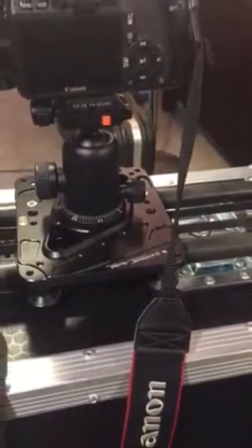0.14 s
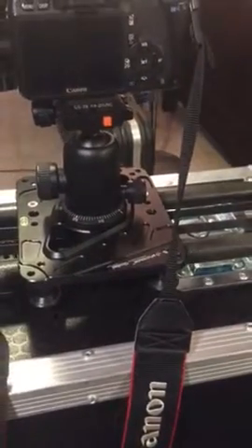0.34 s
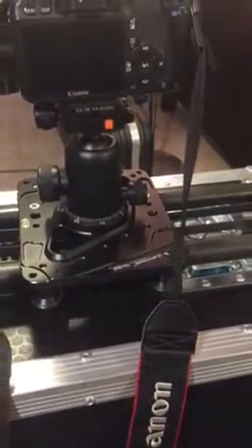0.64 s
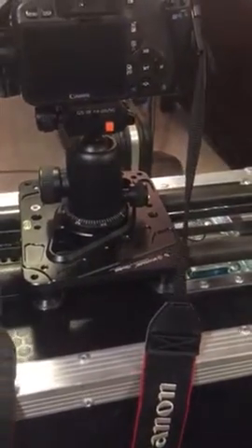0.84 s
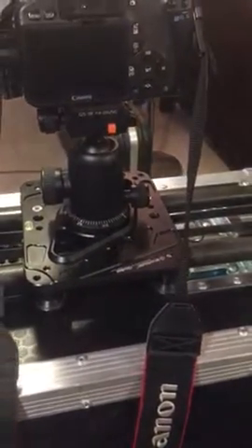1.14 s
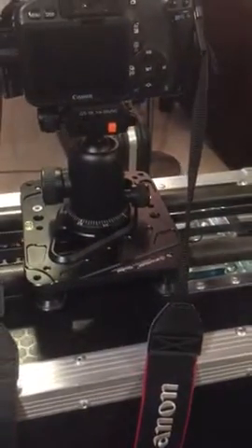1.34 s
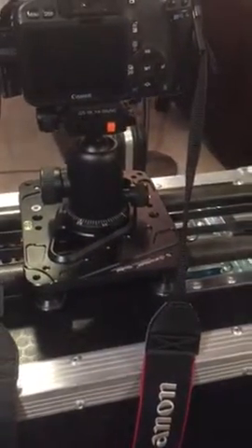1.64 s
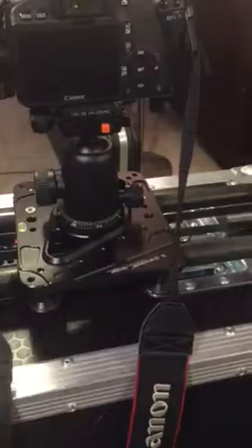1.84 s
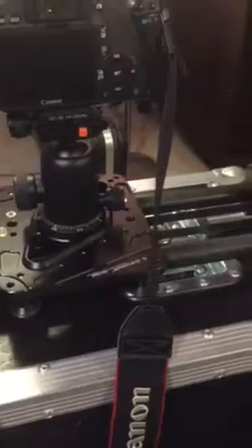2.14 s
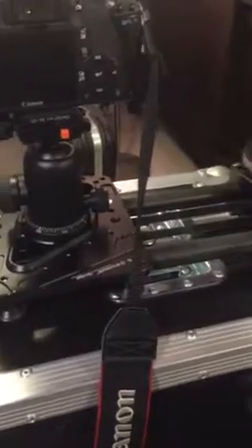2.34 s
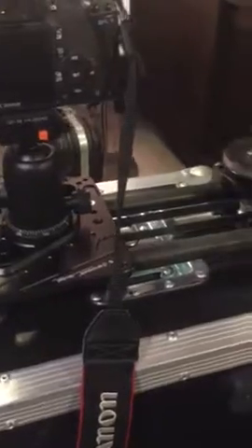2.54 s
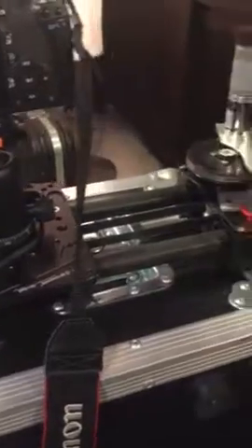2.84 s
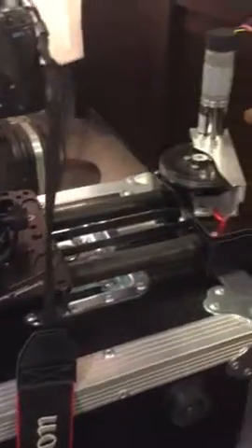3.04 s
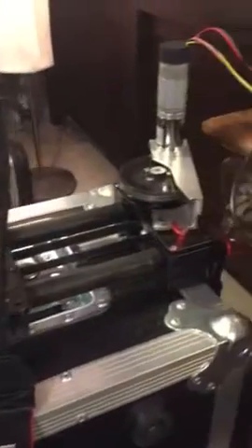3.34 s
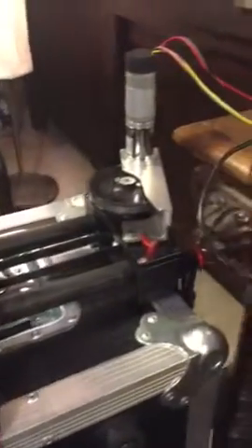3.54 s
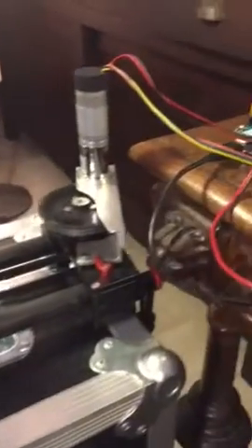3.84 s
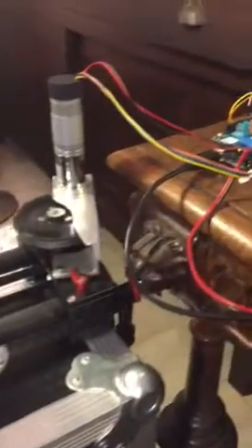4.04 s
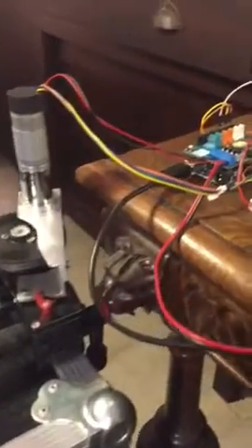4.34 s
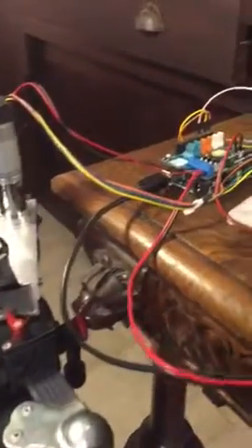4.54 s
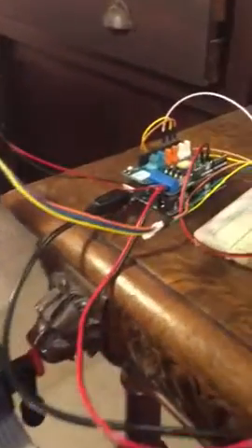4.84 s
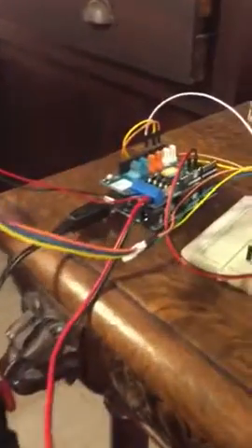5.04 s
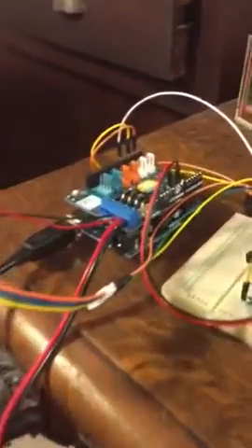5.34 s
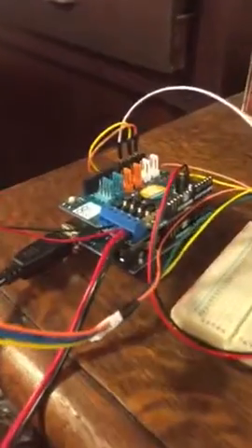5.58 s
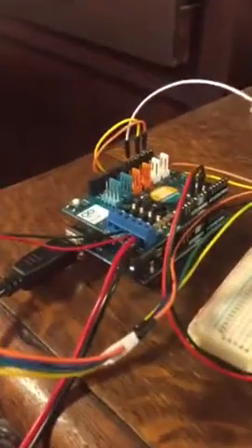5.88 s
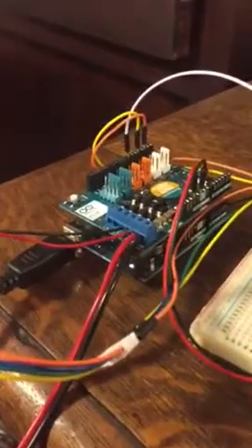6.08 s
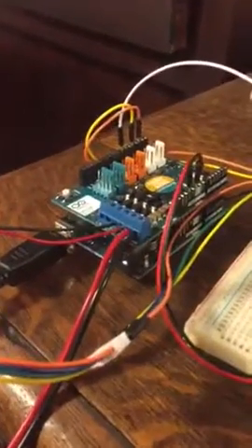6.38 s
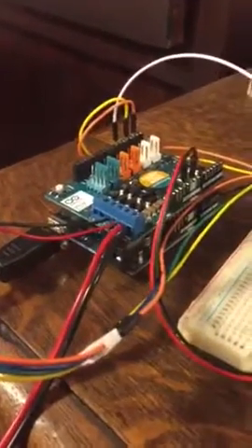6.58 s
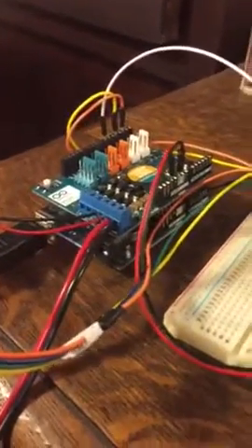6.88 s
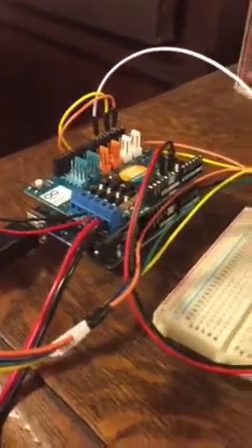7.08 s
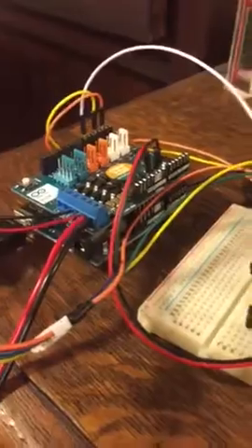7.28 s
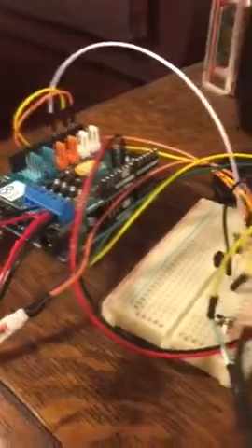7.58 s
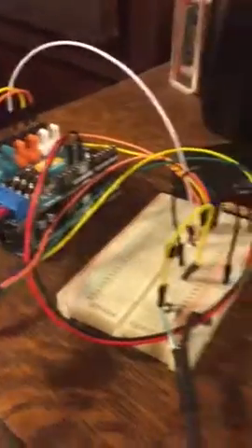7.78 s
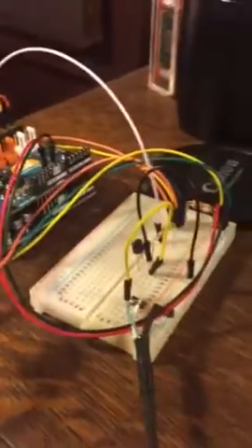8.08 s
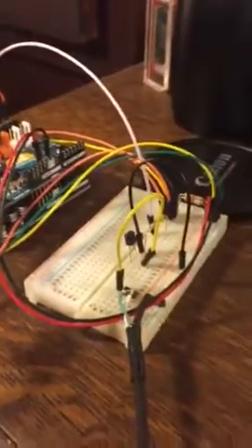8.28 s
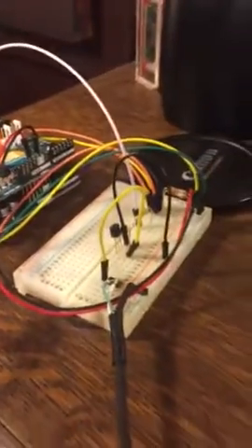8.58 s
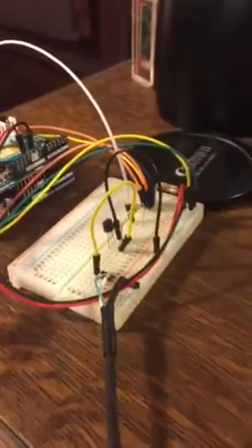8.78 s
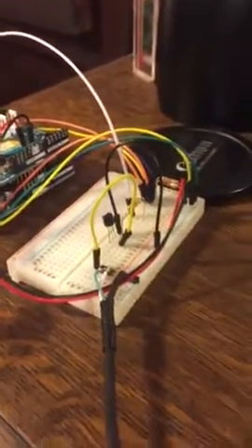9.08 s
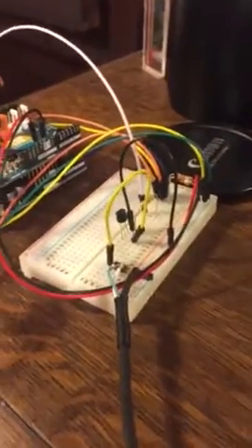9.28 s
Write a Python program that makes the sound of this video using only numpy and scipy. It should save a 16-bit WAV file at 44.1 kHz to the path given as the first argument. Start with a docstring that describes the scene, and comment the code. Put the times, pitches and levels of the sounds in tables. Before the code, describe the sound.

Continuous mechanical whirring from a small motor and belt drive: a fixed-pitch, many-toned whine, a wavering low-mid drone, and dry, quick gear rasps with uneven catches. The close microphone wanders along the rig; mid-way there is a small bump, then the grinding gets louder and crisper with sharp ticks and fine hiss, easing slightly near the end. Short dull room reflections, soft hum and rumble; the motor never stops.

```python
"""Motorized camera slider

A small geared motor pulls a camera carriage along a homemade belt slider, in a quiet room.
Its drive pulses sing as a steady whine made of sine waves; a narrow band of noise hisses, two low notes drone.
Showers of tiny clicks ring the frame: gears grind, rasp about eight times a second, and now and then catch.
Ticks, grit and bumps are short noises; filtered noise and a hum fill the room.
The microphone wanders from the carriage, past the motor, to the table with the control board."""
import sys
import numpy as np
from scipy import signal
from scipy.fft import rfft, irfft
from scipy.io import wavfile

SR = 44100
rng = np.random.default_rng(int(sys.argv[2]) if len(sys.argv) > 2 else 0)


def digitize_waveform(pressure):
    """Quantize a signal to 16-bit integers and store it at the path in sys.argv[1].

    Rows of a 2-D input are taken as channels; values are limited to [-1, 1].
    """
    field = np.atleast_2d(pressure).T
    bounded = np.clip(field, -1, 1)
    quanta = np.round(bounded * 32767).astype(np.int16)
    wavfile.write(sys.argv[1], SR, quanta)


N = 415402
TIME = np.arange(N) / SR  # seconds


def from_db(db):
    """Turn decibels into a gain."""
    return 10 ** (np.asarray(db) / 20)


def rms_one(x):
    """Scale a signal to unit power."""
    return x / np.sqrt(np.mean(x ** 2) + 1e-20)


def in_time(rows):
    """Draw straight lines between a table's points, giving each column sample by sample."""
    s, *columns = np.transpose(rows)
    return [np.interp(TIME, s, column) for column in columns]


def drift(rate):
    """Smooth chance with spread 1, taking a new turn `rate` times a second."""
    points = rng.standard_normal(4000)
    return rms_one(np.interp(TIME * rate, np.arange(4000), points))


def resonate(x, hz, width_hz):
    """Ring like a part with one favourite pitch: steep skirts, and white noise keeps its power."""
    r = np.exp(-np.pi * width_hz / SR)
    section = [1, 0, -1, 1, -2 * r * np.cos(2 * np.pi * hz / SR), r * r]
    response = signal.sosfilt([section] * 2, signal.unit_impulse(8192))
    return signal.sosfilt([section] * 2, x + 1e-18) / np.linalg.norm(response)


def contacts(per_s, spread_db):
    """Small touches of random size at random moments, with silence between them; rms 1."""
    touches = rng.random(N) < per_s / SR
    sizes = from_db(spread_db * np.clip(rng.standard_normal(N), -2, 2))
    return rms_one(touches * sizes)


# the microphone's path: (time [s], spot [number])
# spots: 0 = carriage, 1 = motor, 2 = edge of the table, 3 = control board, 4 = far end
MICROPHONE_PATH = [(0, 0), (2.6, -0.2), (3.7, 0.8), (4.4, 1.44), (5.05, 2.5), (5.7, 3.0), (7.3, 3.0),
                   (8.2, 4.5), (9.42, 4)]


def along_walk(values):
    """A value given at each spot, as the moving microphone meets it."""
    spot, = in_time(MICROPHONE_PATH)
    return np.interp(spot, np.arange(len(values)), values)


DRIVE_HZ = 489.72  # average rate of the drive pulses
# the strong partials swell and fade in the room's standing waves
# levels of the 2nd, 3rd and 4th partial before a small trim: (time [s], level [dB])
SECOND_PARTIAL = [(0.0, -66.5), (2.34, -67), (3.19, -63.5), (4.59, -67.8), (5.18, -60.3), (6.03, -57),
                  (8.52, -61.7), (9.32, -64), (9.42, -64)]
THIRD_PARTIAL = [(0, -61), (1.6, -61.5), (2.5, -77), (3.35, -71), (4.2, -60), (5.6, -59.3), (6.7, -65),
                 (7.4, -57.5), (9.42, -58.1)]
FOURTH_PARTIAL = [(0, -72), (0.23, -57), (0.92, -59.5), (1.08, -74), (1.68, -71), (2.001, -55), (2.55, -55),
                  (2.66, -60.5), (3.42, -65), (3.67, -56), (5.02, -71), (5.12, -53), (5.35, -49),
                  (6.7, -54.5), (6.81, -49), (7.97, -54.5), (8.24, -62.5), (8.55, -56.5), (9.42, -60)]
# average levels of the upper partials: (multiple of the drive rate, level at spots 0, 1, 2, 3 and 4 [dB])
UPPER_PARTIALS = [(5, -68, -68, -60, -66.5, -63), (6, -91, -88, -77, -69, -86),
                  (7, -67, -78, -60.5, -64, -74), (8, -71.5, -62.5, -63.5, -60.5, -63.5),
                  (9, -69, -64.5, -71, -69.5, -63.5), (10, -81, -77.5, -81, -71.5, -79.5),
                  (11, -81, -81, -94, -74.5, -85), (12, -73.5, -75, -86, -84, -95),
                  (13, -77.5, -88, -73.5, -71.5, -66.5), (14, -80, -84, -79, -72, -76),
                  (16, -89, -95, -92, -82, -85), (17, -88, -90, -73, -86, -77),
                  (18, -95, -90, -87, -95, -95), (19, -90, -78, -75, -83, -84),
                  (22, -100, -90, -85, -77, -74.5), (23, -87, -78, -92, -92, -81),
                  (24, -85.5, -79, -85, -82, -79), (25, -96, -93, -103, -87, -82),
                  (26, -105, -93, -88, -75, -85), (27, -100, -93, -83, -81, -83),
                  (28, -104, -91, -90, -91, -81), (29, -98, -84, -86, -84, -79),
                  (30, -90, -88, -99, -81, -77), (31, -92, -87, -87, -83, -81),
                  (32, -89, -85, -88, -82, -79)]


def whine(strong_db=-0.03, upper_db=0.0, wander_db=2.0, flutter=0.024):
    """Exact multiples of the drive rate, fluttering with the load, the high ones most."""
    phase = 2 * np.pi * np.cumsum(DRIVE_HZ + 0.1453 * drift(7)) / SR
    levels = []
    for k, curve in enumerate((SECOND_PARTIAL, THIRD_PARTIAL, FOURTH_PARTIAL), 2):
        levels.append((k, in_time(curve)[0] + strong_db))
    for k, *spots_db in UPPER_PARTIALS:
        levels.append((round(k), along_walk(spots_db) + upper_db + wander_db * drift(3.13)))

    out = np.zeros(N)
    for k, db in levels:
        loudness = np.sqrt(2) * from_db(db) * (1 + flutter * min(k, 10) * drift(55))
        out += loudness * np.sin(k * phase + rng.uniform(0, 2 * np.pi))
    return out


# the output gear turns steadily but runs a little early or late as the belt's load changes:
# (time [s], lag [s])
GEAR_LAG_CURVE = [(0, 0.0028), (1.1, 0.00028), (2.1, 0.013), (3.8, 0.015), (4.4, 0.0056), (5.3, .012),
                  (6.2, -0.01), (6.9, -0.0083), (7.6, -0.0135), (8.0, -0.015), (8.6, -0.00052),
                  (9.42, -0.0065)]
GEAR_TURN_S = 0.12095


def shaft_turns():
    """Turns of the output gear; its tight spot meshes at each whole number."""
    lag_s, = in_time(GEAR_LAG_CURVE)
    return (TIME - lag_s) / GEAR_TURN_S


# the tight spot binds hardest each time an eccentric wheel comes round
ECCENTRIC_S, ECCENTRIC_PEAK_S = 0.42, 0.246  # time per round, moment of a peak
ECCENTRIC_SWING_DB, RASP_CHANCE_DB = 2, 0.65  # swing of the rasps' level, and its random scatter
RASP_SPREAD_MS = 3.2  # typical
# how hard the tight spot binds on average: (time [s], level [dB])
BINDING_CURVE = [(0, -42.5), (1.4, -43.5), (2.5, -45), (3.8, -44.5), (5.1, -45), (5.7, -40.5), (6.8, -40),
                 (8.0, -41), (8.6, -44), (9.42, -42.5)]


def rasps(length_scatter=0.13):
    """One rasp on each turn without a catch, swelling with the eccentric wheel: (s, dB, spread ms)."""
    s = TIME[1:][np.diff(np.floor(shaft_turns())) > 0]
    strength, length = rng.standard_normal((len(s), 2)).T
    squeeze = np.cos(2 * np.pi * (s - ECCENTRIC_PEAK_S) / ECCENTRIC_S)
    average_db = np.interp(s, *np.transpose(BINDING_CURVE))
    db = average_db + ECCENTRIC_SWING_DB * squeeze + RASP_CHANCE_DB * strength
    spread_ms = RASP_SPREAD_MS * np.exp(length_scatter * length)

    to_nearest_catch = np.abs(s[:, None] - np.array(TOOTH_CATCHES)[:, 0]).min(axis=1)
    free = to_nearest_catch > GEAR_TURN_S / 6
    rows = np.transpose([s, db, spread_ms])
    return list(rows[free & (s > GEAR_TURN_S / 2)])


# now and then a tooth catches, in place of a turn's rasp or between two:
# (time [s], level [dB], spread [ms])
TOOTH_CATCHES = [(0.2033, -43, 1.2), (0.24, -38, 2.6), (0.405, -43.5, 1.6), (0.487, -39, 3.6),
                 (0.7287, -39.5, 2.1), (0.9673, -44, 1.3), (1.0875, -40.5, 2.8), (1.337, -42, 2.7),
                 (1.4517, -39.5, 1.2), (1.821, -41.5, 2.1), (2.0657, -39, 2.6), (2.111, -43.5, 2.4),
                 (2.308, -40, 2.1), (2.554, -39, 3.7), (2.794, -37.5, 2.5), (2.9122, -41.5, 1.6),
                 (2.955, -46, 1.7), (3.157, -42.5, 3.3), (3.3225, -43.5, 4), (3.644, -39.5, 3.6),
                 (4.3247, -40, 1.4), (4.524, -42, 1.3), (4.605, -40.5, 0.82), (4.643, -41, 1),
                 (4.8456, -38, 2.3), (4.97, -39.5, 1.7), (5.333, -36.5, 2.8), (5.4922, -45, 0.92),
                 (5.691, -33.5, 2.2), (6.048, -35, 1.2), (6.2035, -41.5, 2.1), (6.281, -40.5, 0.93),
                 (6.4032, -39, 0.7), (6.5228, -36.5, 1.7), (6.566, -46, 0.84), (6.646, -37, 1.4),
                 (6.8486, -45.5, 1.5), (6.889, -37.5, 2), (7.048, -42, .9), (7.4044, -42.5, 1.9),
                 (7.487, -36.5, 1.6), (7.928, -44.5, 3.6), (8.013, -43, 1.1), (8.093, -37.5, 4.1),
                 (8.2148, -36, 3.5), (8.71, -41.5, 2.5), (9.067, -39, 1.57), (9.1116, -45.5, 2.8)]


def rasp_force(ring_db=-17, ring_s=0.012, attack_share=0.99):
    """The teeth bind and let go within a few milliseconds at each rasp or catch, then chatter faintly."""
    power = np.zeros(N)
    for s, db, spread_ms in rasps() + TOOTH_CATCHES:
        near = slice(max(int((s - .03) * SR), 0), int((s + .03) * SR))
        age, spread = TIME[near] - s, spread_ms / 1000
        side = spread * np.where(age < 0, attack_share, 2 - attack_share)
        shape = np.exp(-np.abs(age / (1.7 * side)) ** 2.4)
        # a shorter rasp packs the same energy into a higher peak
        power[near] += from_db(db) ** 2 * .003 / spread * shape
    fade = np.exp(-1 / (ring_s * SR))
    chatter = signal.lfilter([1 - fade], [1, -fade], power)
    return np.sqrt(power + from_db(ring_db) * chatter)


# resonances of gearbox and frame, levels before the trims below: (pitch [Hz], width [Hz],
# grinding at the carriage [dB], grinding at the table [dB], share of a rasp [dB])
FRAME_RESONANCES = [(371.5, 134, -85.5, -75, -29.5), (555, 1590, -72.5, -68.5, -24.5),
                    (690, 200, -101, -76, -30.5), (801, 104, -94.5, -68.5, -26.5),
                    (965, 176, -73, -68, -29.5), (1140, 198, -83, -60.5, -30),
                    (1280, 73, -73.5, -85, -24.5), (1500, 129, -62.5, -59, -28.5),
                    (1655, 166, -70.5, -69.5, -22.5), (1928.5, 113, -64, -60, -22),
                    (2301, 310, -63, -64.5, -17), (2474, 176, -91.5, -59, -14),
                    (2637, 283, -70.5, -63, -8.5), (3002, 330, -79.5, -70.5, -15),
                    (3410, 720, -64, -71.5, -15), (3740, 440, -69, -61.5, -13),
                    (4148, 460, -65.5, -77, -14), (4322, 240, -73, -63, -14.5),
                    (5080, 1360, -77, -70.5, -25), (6380, 1050, -75.5, -73, -26.5),
                    (7085, 230, -84, -68, -34.5), (8600, 820, -79.5, -66, -43),
                    (11400, 6600, -75, -67.5, -36), (13600, 690, -86, -79, -39),
                    (14600, 2200, -79, -73, -30)]


def gears(place, grind_db, tilt_db, throb_db=1.76, low_throb_db=1.5, drive_depth=0.18,
          patchy_db=1.94, rasp_colour_db=2.0, rasp_follow=1.0):
    """Grinding and rasping are showers of tooth contacts that strike every resonance differently."""
    turn = np.cos(2 * np.pi * 3 * shaft_turns())
    low_turn = np.cos(2 * np.pi * 2 * shaft_turns())
    drive_throb = 1 + drive_depth * np.sin(2 * np.pi * DRIVE_HZ * TIME)
    grind = rms_one(drive_throb * contacts(per_s=6000, spread_db=3.0))
    rasp = rasp_force() * contacts(per_s=2800, spread_db=0.0)

    out = np.zeros(N)
    for hz, width_hz, carriage_db, table_db, rasp_db in FRAME_RESONANCES:
        nearer_db = (table_db - carriage_db) * place
        # three throbs a turn; the low resonances also feel two
        throb = throb_db * turn + low_throb_db * (turn + low_turn) * (500 < hz < 1250)
        brightness_db = tilt_db * np.log2(hz / 2500)
        db = carriage_db + nearer_db + grind_db + brightness_db + throb + patchy_db * drift(25)
        # resonances aimed at the table colour the rasps there
        aimed_db = max(table_db - carriage_db - 5.5, 0) * (place - .7)
        share_db = rasp_db + rasp_follow * aimed_db + rasp_colour_db * drift(60)
        force = grind * from_db(db - 2.5) + rasp * from_db(share_db)
        # random signs make each resonance sound independent
        out += resonate(force * rng.choice([-1, 1], N), hz, width_hz)
    return out


# level of the frame's low drone before a trim: (time [s], level [dB])
DRONE_LEVEL = [(0.0, -80.6), (1.3, -73.5), (1.79, -82), (3.09, -69.5), (3.19, -75.4), (5.43, -72.4),
               (6.13, -63.5), (7.03, -74), (7.53, -63.5), (8.47, -74.1), (9.27, -61), (9.42, -68)]
# its close pair of notes: (pitch [Hz], pitch waver [Hz], share [dB])
DRONE_PAIR = [(374, 5.08, -3.5), (395, 5, -4.5)]


def drone(trim_db=-1.0, waver=0.25):
    """Two close notes of the frame, kept going by the motor, waver and beat against each other."""
    level_db, = in_time(DRONE_LEVEL)
    notes = np.zeros(N)
    for hz, pitch_waver_hz, share_db in DRONE_PAIR:
        loudness = from_db(share_db) * (1 + waver * drift(14))
        phase = 2 * np.pi * np.cumsum(hz + pitch_waver_hz * drift(25)) / SR
        notes += loudness * np.sin(phase)
    return np.sqrt(2) * from_db(level_db + trim_db) * notes


HISS_HZ, HISS_WIDTH_HZ = 10420, 680
HISS_PULSES_PER_S = 30.87


def hiss(level_db, pulse_db=2.5):
    """The motor hisses in one high resonance, heard only from some directions, pulsing as it spins."""
    pulse = pulse_db * np.cos(2 * np.pi * HISS_PULSES_PER_S * TIME)
    noise = resonate(rng.standard_normal(N), HISS_HZ, HISS_WIDTH_HZ)
    return from_db(level_db + pulse) * noise


def burst(s, db, decay_s):
    """A puff of noise that dies away from its start."""
    age = TIME - s
    fade = (age >= 0) * np.exp(-np.minimum(np.abs(age) / decay_s, 30))
    return from_db(db) * fade * rng.standard_normal(N)


# small sharp ticks, before trim and filter: (time [s], level [dB])
SHARP_TICKS = [(0.4389, -57), (1.0116, -56), (1.7544, -52), (3.717, -50), (5.245, -54), (5.7753, -47),
               (6.2068, -46), (6.8493, -43), (7.2654, -46), (8.0098, -45)]
# soft bumps, before trim and filter: (time [s], level [dB], pitch [Hz])
SOFT_BUMPS = [(0.24, -71, 500), (3.762, -57, 536), (4.118, -82, 280), (7.753, -66, 130), (7.757, -58, 275),
              (8.011, -58, 316), (8.106, -62, 258)]


def knocks(place, tick_db=-7, tick_s=0.0093, bump_db=3.5, bump_s=0.0088, grit_db=-88):
    """Bright ticks, specks of grit under the rollers and dull bumps of the rig, each from noise or clicks."""
    ticks = sum(burst(s, db + tick_db, tick_s) for s, db in SHARP_TICKS)
    grit = from_db(grit_db + 12.0 * place) * contacts(per_s=12, spread_db=2.5)
    bumps = np.zeros(N)
    for s, db, hz in SOFT_BUMPS:
        bumps += resonate(burst(s, db + bump_db, bump_s), hz, 1.06 * hz)
    return resonate(ticks + grit, 12100, 7300) + bumps


def room(x, t60=0.17, wet_db=-11, wall_hz=6000):
    """Furniture and walls add a short, dull tail, fading by 60 dB in t60 seconds."""
    age = TIME[:SR // 2]
    tail = rng.standard_normal(len(age)) * from_db(-60 * age / t60) * (age > .004)
    dull = signal.butter(1, wall_hz, fs=SR, output="sos")
    tail = signal.sosfilt(dull, tail / np.linalg.norm(tail))
    return x + from_db(wet_db) * signal.fftconvolve(x, tail)[:N]


MAINS_HZ = 100
# low hums of the room: (pitch [Hz], width [Hz], level at the carriage [dB], level at the table [dB])
LOW_HUMS = [(46.3, 14, -81, -77.5), (141, 27, -80.5, -81)]
# colour of the room's rumble, only relative: (pitch [Hz], level per Hz [dB])
ROOM_COLOUR = [(15, -41), (25, -20), (38, -1), (70, -5), (86, 0.5), (96, 6.5), (110, 0), (125, -10),
               (176, -7.5), (316, -7.5), (330, -24), (430, -44), (730, -120)]


def hums(place, mains_db=-74.0, rumble_db=-73.5):
    """Mains hum is a sine; wavering low hums and the rumble of the room are filtered noise."""
    mains_level = from_db(mains_db + 1.9 * drift(1.8))
    mains = np.sqrt(2) * mains_level * np.sin(2 * np.pi * MAINS_HZ * TIME)
    notes = np.zeros(N)
    for hz, width_hz, carriage_db, table_db in LOW_HUMS:
        level = from_db(carriage_db + (table_db - carriage_db) * place)
        notes += level * resonate(rng.standard_normal(N), hz, width_hz)

    hz, db = np.transpose(ROOM_COLOUR)
    bins_hz = np.arange(N // 2 + 1) * SR / N
    colour = from_db(np.interp(np.log(bins_hz + 1), np.log(hz), db))
    rumble = rms_one(irfft(rfft(rng.standard_normal(N)) * colour, N))
    # mains and rumble grow a little towards the table
    return notes + (mains + from_db(rumble_db) * rumble) * from_db(3.1 * (place - .5))


# what each spot hears, one row per spot: (place [0 = carriage .. 1 = table], grinding trim [dB],
# brightness [dB per octave], hiss before its pulsing [dB])
SPOT_HEARING = [(0.048, 0.7, -0.9, -83.5), (0.5, 1.0, -0.84, -72), (0.77, -1.0, -0.4, -79),
                (0.99, 0.57, -0.5, -64.5), (0.93, -2, -1.1, -75)]


def scene():
    """All sources as heard along the microphone's path."""
    place, grind_db, tilt_db, hiss_db = [along_walk(column) for column in np.transpose(SPOT_HEARING)]
    motor = whine() + hiss(hiss_db) + drone()
    rig = room(gears(place, grind_db, tilt_db) + knocks(place))
    return (motor + rig + hums(place))[None]


CUTOFF_HZ = 15750


def record(dry):
    """The microphone loses the deepest bass; the top is cut steeply."""
    thin = signal.sosfilt(signal.butter(4, 36, "high", fs=SR, output="sos"), dry)
    return signal.sosfilt(signal.ellip(12, .2, 80, CUTOFF_HZ, fs=SR, output="sos"), thin)


dry = scene()
out = record(dry)
digitize_waveform(out)
```